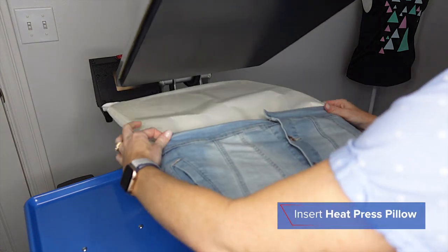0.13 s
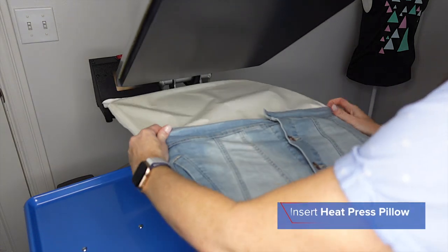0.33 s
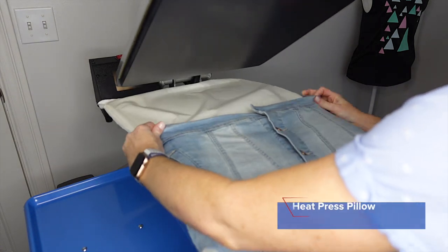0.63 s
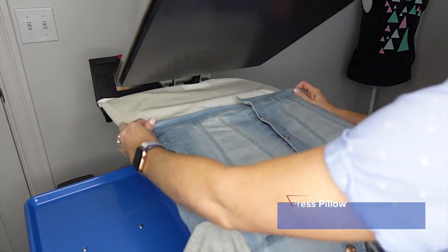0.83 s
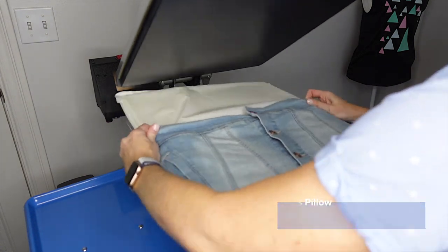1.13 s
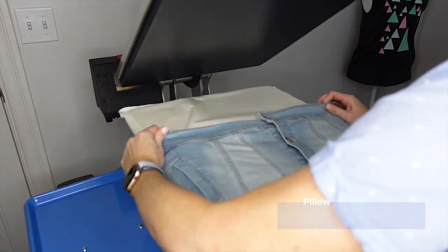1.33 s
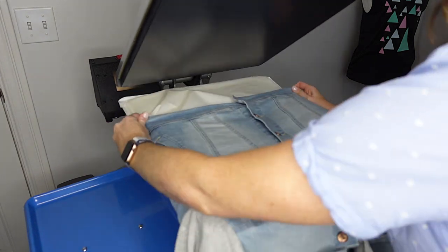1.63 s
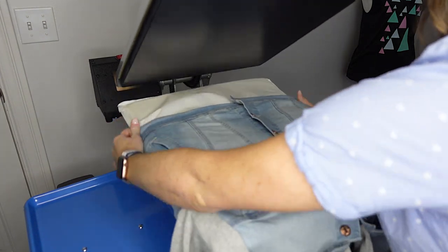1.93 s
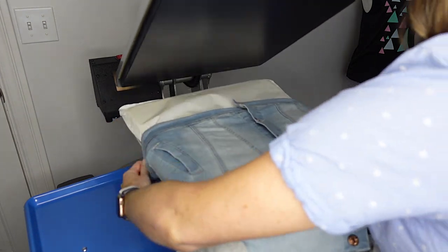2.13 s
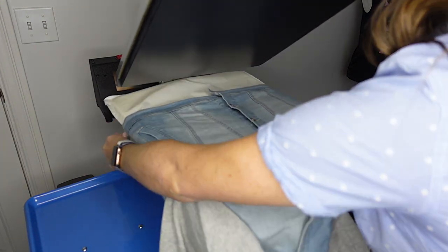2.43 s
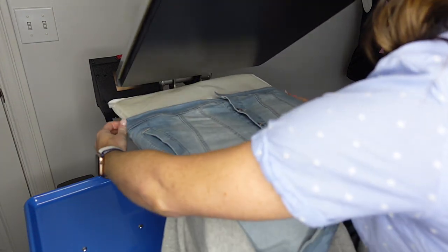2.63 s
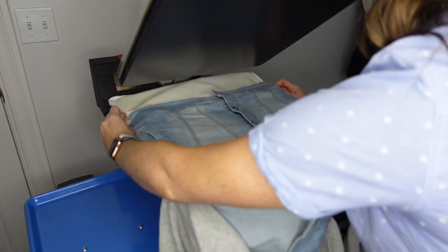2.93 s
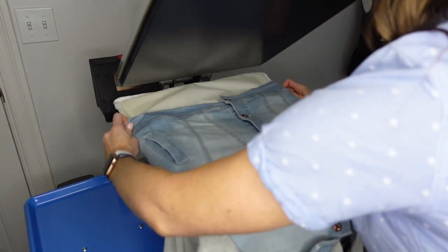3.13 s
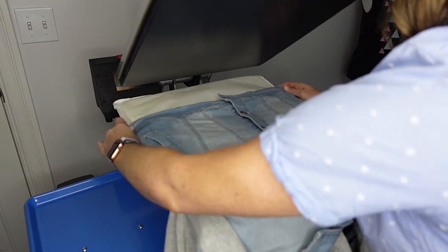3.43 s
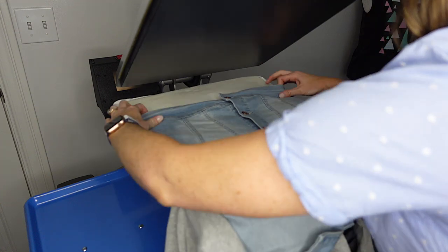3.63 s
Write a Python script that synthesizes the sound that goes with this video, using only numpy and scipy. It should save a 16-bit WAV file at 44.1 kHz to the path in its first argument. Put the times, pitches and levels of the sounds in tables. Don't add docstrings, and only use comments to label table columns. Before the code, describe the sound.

Thick denim is pulled over a padded press in irregular tugs: dull pops, crinkles, faint fabric hiss and small snaps, thinning midway, then returning. Close microphone, small room with quiet air and low hum.

```python
import sys
import numpy as np
from scipy import signal
from scipy.fft import rfft, irfft, next_fast_len
from scipy.io import wavfile
from scipy.ndimage import uniform_filter1d, map_coordinates

SR = 44100
rng = np.random.default_rng(int(sys.argv[2]) if len(sys.argv) > 2 else 0)


def invert_db(level):
    return 10 ** (np.asarray(level, dtype=float) / 20)


def master(y):
    cut = np.clip(np.atleast_2d(y).T, -1, 1)
    pcm = np.round(cut * 32767)
    wavfile.write(sys.argv[1], SR, pcm.astype(np.int16))


N = 167580
T = np.arange(N) / SR


def unit(x):
    return x / np.sqrt(np.mean(x ** 2) + 1e-20)


def along(points, hz):
    f, value = np.transpose(points)
    return np.interp(np.log(hz + 1), np.log(f + 1), value)


def wobble(rate):
    return np.tanh(map_coordinates(rng.standard_normal(800), [T * rate]))


def shaped(x, spectrum):
    size = next_fast_len(N + 8192)
    gain = invert_db(along(spectrum, np.fft.rfftfreq(size, 1 / SR)))
    return irfft(rfft(x, size) * gain, size)[..., :N]


def coloured(x, spectrum):
    return unit(shaped(x, spectrum))


def place(times, shapes):
    start = np.round(np.asarray(times) * SR).astype(int)[:, None]
    at = np.clip(start + np.arange(shapes.shape[1]), 0, N)
    return np.bincount(at.ravel(), shapes.ravel(), N + 1)[:N]


def buckles(s, gain, hz, cycles, size):
    before = size // 3
    u = (np.arange(size) - before) / SR * (hz / cycles)[:, None]
    swell = np.exp(-np.log(16) * (u * np.where(u < 0, 1.4, 0.9)) ** 2)
    ring = 0.26 * (u > 0) * (1 - np.exp(-abs(u))) * np.exp(-0.6 * abs(u))
    phase = np.pi + rng.standard_normal((len(s), 1))
    wave = np.cos(2 * np.pi * u * cycles[:, None] + phase)
    return place(s - before / SR, gain[:, None] * (swell + ring) * wave)


def effort(slide):
    # middle in seconds, half length in seconds, buckling level in dB,
    # sliding over buckling in dB.
    pulls = [(0, 0.053, -35.5, -43), (0.132, 0.019, -45, -12), (0.173, 0.045, -39, -21.5),
             (0.296, 0.014, -36, -24), (0.361, 0.037, -43, -17), (0.479, 0.04, -37.5, -21),
             (0.55, 0.019, -37, -20.5), (0.635, 0.015, -43, -20), (0.778, 0.11, -39.5, -17),
             (0.884, 0.025, -40.5, -19), (0.952, 0.025, -34, -17), (1.041, 0.048, -41.5, -17),
             (1.143, 0.035, -38.5, -33), (1.243, 0.098, -38, -17), (1.428, 0.043, -38.5, -15.5),
             (1.55, 0.056, -33, -18.5), (1.664, 0.021, -36, -21), (1.775, 0.093, -35, -16.5),
             (2.043, 0.053, -38, -16.5), (2.385, 0.06, -35.5, -16), (2.525, 0.044, -45, -13),
             (2.608, 0.035, -45, -17), (2.904, 0.07, -47.5, -15.5), (3.093, 0.059, -41, -19),
             (3.141, 0.0077, -35, -21), (3.251, 0.073, -36, -24), (3.41, 0.055, -39, -19.5),
             (3.62, 0.031, -43.5, -10), (3.687, 0.0073, -40.5, -28), (3.8, 0.088, -50.5, -6.5)]
    slap = [
        (3.39, .006, -33, -13),
    ]
    power = np.zeros(N)
    for s, half, db, over_db in pulls + slap:
        power += invert_db(2 * (db + slide * over_db)) * np.exp(-((T - s) / half) ** 2 * 0.93)
    return np.sqrt(power)


def cloth():
    # frequency in Hz, level in dB per Hz.
    friction = [(100, -4.5), (530, -3.5), (826, -10.5), (1150, -18), (1900, -16.5), (2600, -26),
                (4400, -34), (9000, -52.5)]
    draw = rng.random((2400, 3))
    fine = np.arange(len(draw)) % 4 == 0
    hz = 644 * np.exp(0.437 * rng.standard_normal(len(draw))) * np.where(fine, 2.6, 1)
    gain = invert_db(-4.5 * np.log(draw[:, 1] + 0.04) - 13 * fine)
    cycles = 0.72 + 2.67 * draw[:, 2] ** 2
    crowd = unit(buckles(draw[:, 0] * N / SR, gain, hz, cycles, size=900))
    grains = rng.standard_normal(N) * invert_db(3.74 * wobble(150))
    drag = unit(coloured(grains, friction) * invert_db(0.8 * wobble(40)))
    crowd_share = 0.52
    return effort(0) * (np.sqrt(crowd_share) * crowd + np.sqrt(1 - crowd_share) * drag)


def weave():
    # frequency in Hz, level in dB per Hz.
    hiss = [(1500, -16), (4200, 1.5), (7000, -7.5), (12500, -4.5)]
    surface = invert_db(1.9 * wobble(30.31) + 0.87 * wobble(9.6))
    return invert_db(-2.0) * effort(0.93) * surface * coloured(rng.standard_normal(N), hiss)


def pops():
    # time in seconds, peak in dB, pitch in Hz, length in cycles.
    large = [(0.2121, -14, 460, 1.2), (0.2957, -23, 443, 0.8), (0.3712, -23, 583, 1.2),
             (0.4035, -25, 530, 1.3), (0.4618, -16, 516, 1.3), (0.7944, -22, 615, 1.4),
             (0.8393, -22, 540, 1.6), (0.9269, -24, 651, 1.2), (0.944, -21, 597, 1.0),
             (0.9568, -21, 625, 3.3), (1.1091, -18, 693, 1.4), (1.1741, -17, 767, 1.1),
             (1.556, -19, 466, 1.1), (1.8006, -17, 586, 1.3), (1.894, -27, 655, 1.0),
             (1.9704, -22, 752, 1.6), (2.0533, -20, 387, 0.9), (2.4127, -21, 625, 0.9),
             (2.6203, -29, 800, 0.9), (2.8282, -28, 557, 1.1), (3.0647, -22, 791, 1.9),
             (3.0945, -24, 795, 2.1), (3.1415, -23, 688, 1.1), (3.1756, -26, 566, 1.0),
             (3.3901, -22, 860, 1.3), (3.6877, -23, 471, 0.8)]
    # time in seconds, peak in dB, pitch in Hz.
    folds = [(0.0604, -34, 630), (0.1722, -27, 575), (0.5448, -24.5, 520), (0.7304, -39, 458),
             (0.8034, -25, 513), (0.858, -26, 543), (1.058, -26, 674), (1.0836, -24.5, 590),
             (1.517, -23.5, 506), (1.6354, -28, 560), (2.857, -34.5, 620), (2.4346, -22, 710),
             (2.93, -38, 480), (3.0553, -25, 735), (3.2625, -22, 500), (3.151, -24, 840),
             (3.4557, -23, 785), (3.7129, -27, 724), (3.691, -28, 283)]
    more_folds = [
        (.482, -27, 493),
        (.623, -28.5, 1060),
        (1.94, -26.5, 755),
        (2.394, -22.5, 910),
        (3.798, -29.5, 880),
    ]
    # start in seconds, peak in
    # dB, pitch in Hz.
    fold_starts = [(0.106, -28, 493), (.116, -27, 616), (.145, -33, 600), (.286, -28.5, 676), (.326, -37, 657),
                   (.429, -30, 390), (0.883, -28, 525), (.959, -20, 590), (1.182, -28, 393), (1.261, -34, 595),
                   (1.276, -26.5, 404), (1.43, -22, 380), (1.55, -22, 400), (1.571, -22.5, 503),
                   (1.826, -39, 522), (1.851, -25.5, 450), (2.014, -22.5, 795), (2.047, -20.5, 780),
                   (2.325, -30.5, 288), (2.354, -29, 245), (2.772, -37, 522), (2.993, -34, 616),
                   (3.034, -29, 786), (3.409, -23, 654), (3.417, -26.5, 297), (3.519, -42, 290),
                   (3.551, -42, 670), (3.659, -31.5, 620)]
    clicks = [(0.1057, -40, 1250), (0.171, -41, 1210), (0.294, -47, 1620), (0.3272, -28.5, 1530),
              (0.37, -31.5, 1580), (0.4602, -29.5, 1280), (0.5332, -42, 1280), (0.5415, -39, 1210),
              (0.6962, -37, 1490), (0.7655, -33, 1500), (0.7937, -26, 1570), (0.9228, -27, 1810),
              (1.0382, -30.5, 1490), (1.1365, -27, 1170), (1.2315, -34.5, 1900), (1.262, -35, 1330),
              (1.3336, -34, 1380), (1.478, -30.5, 1480), (1.5543, -27.5, 1690), (1.6476, -36, 1570),
              (1.749, -40, 1370), (1.8465, -28, 1660), (2.0145, -37, 1240), (2.0484, -39, 1610),
              (2.2593, -40, 1800), (2.4116, -29, 1220), (2.4803, -30, 1580), (2.9946, -41, 1370),
              (3.0612, -27.5, 1380), (3.225, -29, 1300), (3.263, -28, 1290), (3.352, -37, 1370),
              (3.3892, -32, 1340), (3.642, -35.5, 1460)]
    fold_cycles, click_cycles = 1.2, 1.63
    start_lag_s, click_lag_s = 0.00284, 0.001496
    rows = large + [(*row, fold_cycles) for row in folds + more_folds]
    rows += [(s + start_lag_s, db, hz, fold_cycles) for s, db, hz in fold_starts]
    rows += [(s + click_lag_s, db, hz, click_cycles) for s, db, hz in clicks]
    s, db, hz, cycles = np.transpose(rows)
    return buckles(s, invert_db(db), hz, cycles, size=1500)


def snaps():
    # time in seconds, peak in dB, tilt in dB per octave.
    seams = [(0.1073, -31, -10), (0.1762, -28.5, -12), (0.2958, -43, -7), (0.545, -36.5, -8.5),
             (0.697, -34.5, -10.5), (0.793, -30.5, -13.5), (0.8013, -29.5, -16), (0.9258, -28.5, -9.5),
             (1.039, -39, -6), (1.057, -38, -7.5), (1.1384, -49, -6), (1.2323, -34, -9.1),
             (1.261, -33.5, -14), (1.478, -32, -13), (1.5546, -37, -11), (1.648, -47, -11),
             (1.7273, -36, -7), (2.0167, -30, -27), (2.0484, -31.5, -8.5), (2.26, -40, -24),
             (2.4824, -38, -13), (3.0481, -34, -4), (3.0649, -38, -8), (3.2256, -34, 1.5),
             (3.2724, -34, -5), (0.1103, -32, -13), (0.178, -31, -12), (1.114, -40, -3.5), (3.293, -57, 3)]
    # time in seconds, peak in dB.
    ticks = [(0.0512, -42), (0.3297, -39), (0.8692, -42), (0.8856, -45), (0.9435, -32), (1.2687, -38),
             (1.4934, -41), (1.5027, -31), (1.7785, -32.5), (1.8492, -34.5), (2.333, -38), (3.3898, -37.5),
             (3.405, -35), (3.6416, -43)]
    when = rng.random(90) * (N - 1)
    pull_db = 20 * np.log10(effort(0)[when.astype(int)])
    stray_db = pull_db - 5.5 + 7 * rng.standard_normal(len(when))
    dull = [(*row, -11) for row in ticks + list(zip(when / SR, stray_db))]
    s, db, tilt = np.transpose(seams + dull)

    t, hz = np.arange(1024) / SR, np.fft.rfftfreq(2048, 1 / SR)
    snap_s, lead = 0.0011, 64
    burst = rng.standard_normal((len(s), len(t))) * np.exp(-(t / snap_s - 2) ** 2)
    colour = invert_db(tilt[:, None] * np.log2(np.maximum(hz, 1500) / 2000))
    colour = colour * hz ** 2 / (hz ** 2 + 1200 ** 2) / (1 + (hz / 10000) ** 6)
    crack = np.roll(irfft(rfft(burst, 2048) * colour, 2048), lead, 1)
    crack /= np.linalg.norm(crack, axis=1, keepdims=True)
    return place(s - lead / SR - 2 * snap_s, invert_db(db + 14.5)[:, None] * crack)


def creaks():
    # start in seconds, length in seconds, level in dB, first pitch in Hz, last pitch in Hz.
    squeaks = [
        (0.765, 0.025, -30.5, 540, 574),
        (1.404, .033, -31.5, 927, 544),
        (1.444, 0.016, -28.5, 522, 730),
        (1.559, 0.014, -42, 2980, 3460),
        (3.384, .011, -19.5, 834, 750),
        (3.386, 0.01, -32, 1390, 1310),
        (2.652, 0.011, -47, 1770, 1650),
    ]
    out = np.zeros(N)
    for s, length, db, first_hz, last_hz in squeaks:
        u = np.clip((T - s) / length, 0, 1)
        swell = np.sqrt(abs(np.sin(np.pi * u)))
        turns = length * (first_hz * u + (last_hz - first_hz) * u ** 2 / 2)
        out += invert_db(db) * swell * np.sin(2 * np.pi * turns)
    return out * invert_db(-0.5 * wobble(180))


def thuds():
    # time in seconds, peak in dB, pitch in Hz.
    bumps = [
        (2.24, -41, 37),
        (2.165, -42, 32),
        (2.37, -36.5, 44),
        (1.56, -34, 80),
        (3.339, -29.5, 86),
    ]
    s, db, hz = np.transpose(bumps)
    return buckles(s, invert_db(db), hz, np.full(len(s), 1.1), size=9000)


def room(x):
    # frequency in Hz, time to fall 60 dB in seconds.
    decay = [(300, 0.15), (8000, 0.22)]
    hz, t, z = signal.stft(rng.standard_normal((4, SR // 4)), SR, nperseg=256)
    tail = signal.istft(z * invert_db(-60 * t / along(decay, hz)[:, None]), SR, nperseg=256)[1]
    tail /= np.linalg.norm(tail, axis=1, keepdims=True)
    turn = np.cos(np.pi * (T / 0.4 + np.arange(4)[:, None] / 4)) ** 2 / np.sqrt(1.5)
    wet = signal.fftconvolve(x * turn, tail, axes=1).sum(0)
    return np.pad(wet, (150, 0))[:N]


def background():
    # frequency in Hz, level in dB per Hz.
    air = [(40, -2), (150, -10.5), (600, -10), (2500, -28.5), (8000, -34), (13000, -32.5)]
    table_rumble = [(40, 10), (90, -2), (180, -24), (400, -46)]
    hum = invert_db(-58.5 + 1.7 * wobble(13)) * np.sin(2 * np.pi * 116.6 * T)
    push = uniform_filter1d(unit(effort(0)), size=4000) + 0.024
    rumble = invert_db(-52.5) * push * coloured(rng.standard_normal(N), table_rumble)
    return hum + rumble + invert_db(-51) * coloured(rng.standard_normal(N), air)


def scene():
    near = cloth() + weave() + pops() + snaps() + creaks() + thuds()
    return (near + invert_db(-10) * room(near) + background())[None]


def band_limit(x):
    return signal.sosfilt(signal.butter(12, 15830, fs=SR, output="sos"), x)


def record(dry):
    # frequency in Hz, gain in dB.
    mic_top = [(13500, 0), (15700, -5), (15800, -90)]
    return band_limit(shaped(dry, mic_top))


dry = scene()
out = record(dry)
master(out)
```